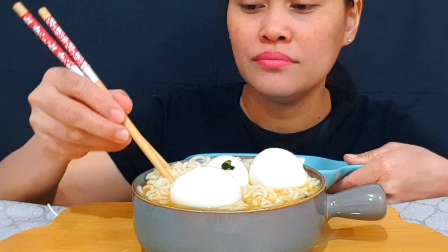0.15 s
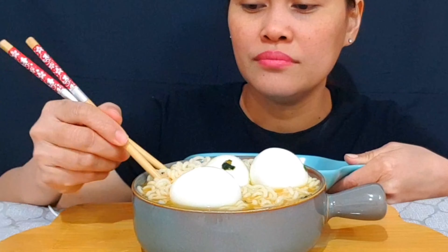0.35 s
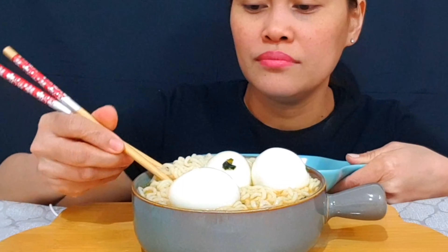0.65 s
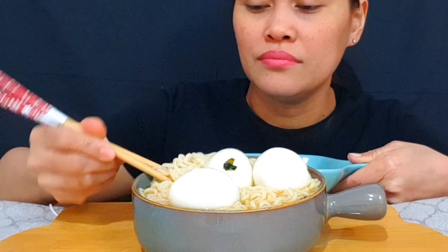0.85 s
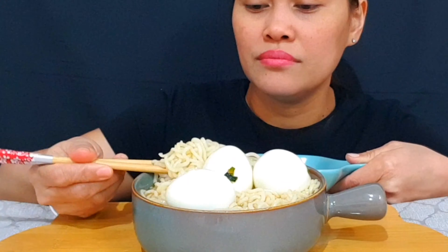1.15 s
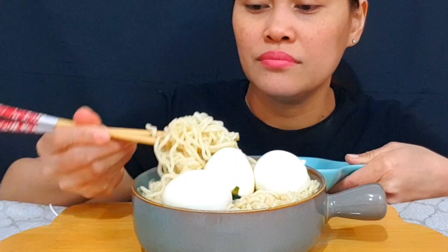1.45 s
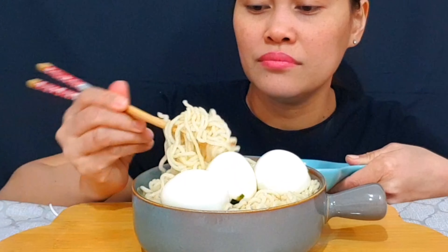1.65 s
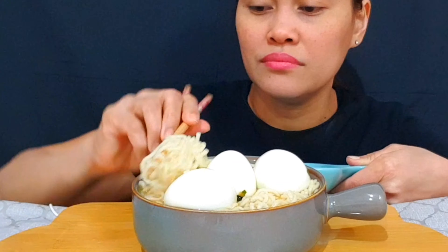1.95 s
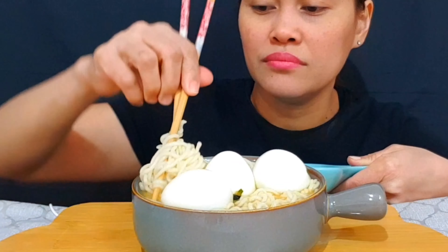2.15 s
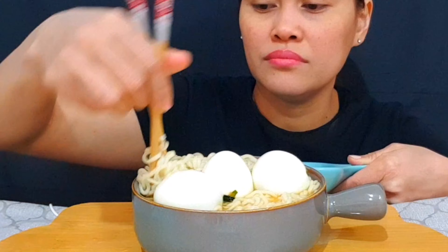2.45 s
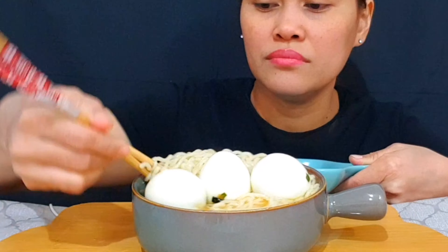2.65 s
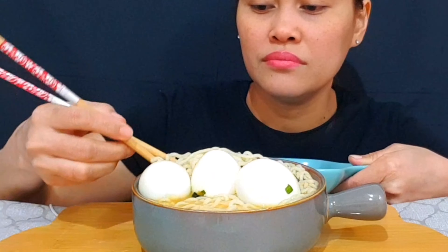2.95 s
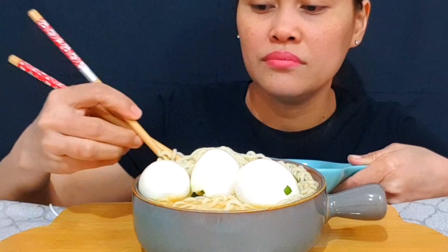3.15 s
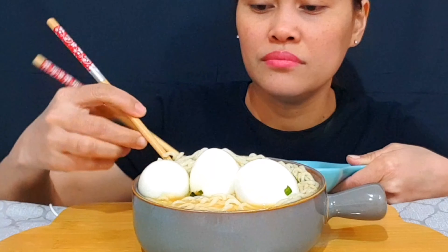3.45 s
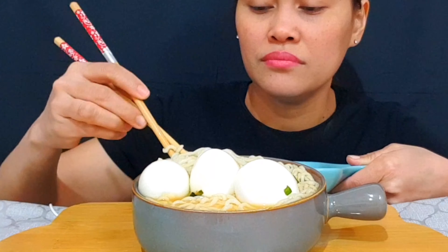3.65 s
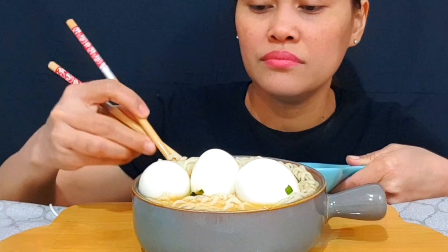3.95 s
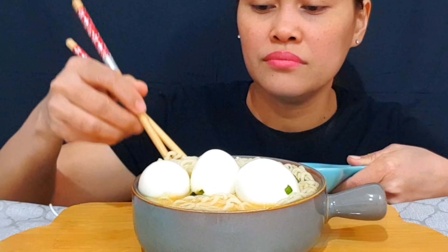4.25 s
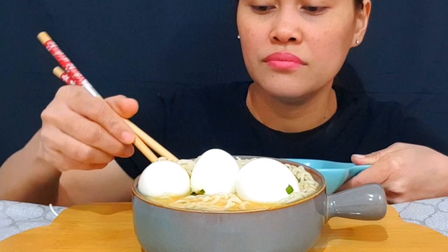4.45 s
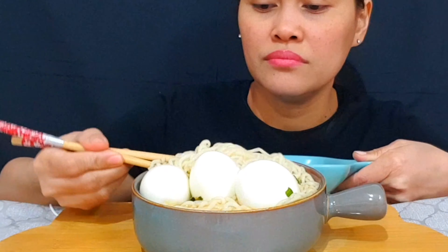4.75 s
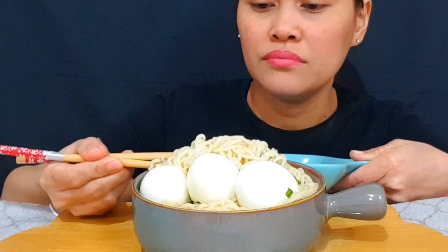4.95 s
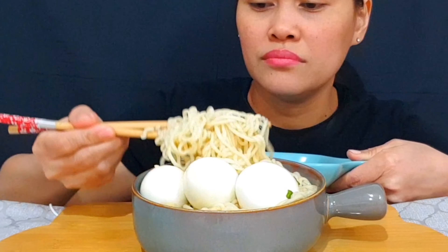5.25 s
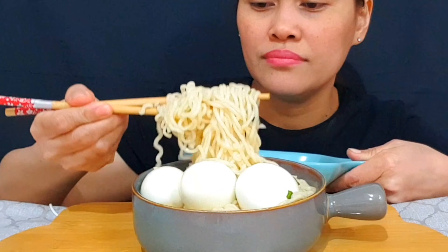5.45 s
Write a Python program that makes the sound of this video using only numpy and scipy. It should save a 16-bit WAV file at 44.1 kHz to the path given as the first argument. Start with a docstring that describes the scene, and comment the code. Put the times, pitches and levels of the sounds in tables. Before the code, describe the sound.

Scattered soft handling sounds open the scene: low rubs, muffled bumps, little snaps of wet noodles and wooden chopsticks ticking together. After a sparser stretch, the rubbing swells and the sticks strike the ceramic pot with a loud, short clink, then clink again and bounce lightly. Everything is heard up close in a quiet, dry room with faint hum and microphone hiss.

```python
"""A quiet, dry room, close to a ceramic pot of broth: wooden chopsticks stir and lift noodles.
Each hand movement brings a soft low rubbing rumble of handling and a faint hiss; between and among
them come small bumps and snaps of wet strands. The sticks tick against each other in their bending modes.
Twice they knock the pot, whose wall clinks while they bounce on it.
Low room noise, a hum and microphone hiss lie underneath."""
import sys
import numpy as np
from scipy import signal
from scipy.fft import rfft, irfft, next_fast_len
from scipy.io import wavfile
from scipy.ndimage import uniform_filter1d

SR = 44100
rng = np.random.default_rng(int(sys.argv[2]) if len(sys.argv) > 2 else 0)


def output_pcm(signal):
    """Save a mono or channel-first signal as 16-bit PCM at the path in sys.argv[1].

    Samples are clipped to [-1, 1] before scaling.
    """
    pcm = np.clip(np.atleast_2d(signal).T, -1, 1) * 32767
    wavfile.write(sys.argv[1], SR, np.round(pcm).astype(np.int16))


N = 246750


def from_db(db):
    """Decibels to gain."""
    return 10 ** (np.asarray(db) / 20)


def rms_one(x):
    """Scale to rms 1."""
    return x / np.sqrt(np.mean(x ** 2) + 1e-20)


def seconds(length_s):
    """Time axis."""
    return np.arange(int(length_s * SR)) / SR


def add(out, time_s, sound):
    """Mix a sound in at time_s."""
    start = int(round(time_s * SR))
    out[start:start + len(sound)] += sound[:N - start]


def cut(x, hz, kind, order=2):
    """Butterworth low- or high-pass."""
    return signal.sosfilt(signal.butter(order, min(hz, .45 * SR), kind, fs=SR, output="sos"), x + 1e-18)


def resonate(x, hz, width_hz):
    """Two-pole resonance, peak gain 1."""
    radius = np.exp(-np.pi * width_hz / SR)
    feedback = [1, -2 * radius * np.cos(2 * np.pi * hz / SR), radius ** 2]
    return signal.lfilter(np.array([1, 0, -1]) * (1 - radius ** 2) / 2, feedback, x + 1e-18)


def colour(x, spectrum):
    """Shape by (frequency [Hz], level [dB]) points; rms 1."""
    size = next_fast_len(N)
    hz, db = np.transpose(spectrum)
    bins_hz = np.maximum(np.arange(size // 2 + 1) * SR / size, 1)
    gain = from_db(np.interp(np.log(bins_hz), np.log(hz), db))
    return rms_one(irfft(rfft(x, size) * gain, size)[:N])


def grains(per_s, spread_db):
    """Clicks of random time, size and sign."""
    sizes = from_db(spread_db * np.minimum(rng.exponential(1, N), 4))
    return (rng.random(N) < per_s / SR) * sizes * rng.choice([-1, 1], N)


def ring(t, hz, t60_s):
    """One struck mode: a decaying sine."""
    return np.sin(2 * np.pi * hz * t) * np.exp(-np.log(1000) * t / t60_s)


def background(room_db=-56.5, hum_hz=120, hum_width_hz=14, hum_db=-65, hiss_db=-66.5, side_db=-67):
    """Low room noise, a wavering hum and microphone hiss, part of it wide; stereo."""
    # noise spectra: (frequency [Hz], relative density [dB])
    room_spectrum = [(12, -50), (20, -26.5), (27, -18.5), (43, -4.5), (113, -7), (131, -3.5), (147, -16.5),
                     (318, -25), (653, -37), (1000, -39), (1300, -68), (2200, -120)]
    hiss_spectrum = [(400, -10), (1000, -1.5), (2500, -2.5), (5000, -3.5), (8500, 1), (11500, -3.5),
                     (15500, -5)]
    side_spectrum = [(30, 5.5), (300, -3), (3000, -1.5), (8000, 0.5), (15000, -1.5)]
    white = rng.standard_normal((4, N))
    room = from_db(room_db) * colour(white[0], room_spectrum)
    hum_band = resonate(resonate(white[1], hum_hz, hum_width_hz), hum_hz, hum_width_hz)
    hum = from_db(hum_db) * rms_one(hum_band)
    hiss = from_db(hiss_db) * colour(white[2], hiss_spectrum)
    side = from_db(side_db) * colour(white[3], side_spectrum)
    return room + hum + hiss + side * np.array([[1], [-1]])


def movement(start_s, length_s, swell_db, attack_s=0.013, release_db_per_s=499.5):
    """Envelope of one hand movement: quick onset, a level ramp, fast release."""
    t = np.arange(N) / SR - start_s
    ramp_db = swell_db * (np.clip(t / length_s, 0, 1) - 1)
    release_db = release_db_per_s * np.maximum(t - length_s, 0)
    return np.clip(t / attack_s, 0, 1) * from_db(ramp_db - release_db)


def handling(low_hz=60, top_hz=450, even_s=0.017, power_floor=0.16, flutter=.6):
    """Soft low rubbing rumble of handling, with a faint fine hiss, swelling with each hand movement."""
    # hand movements: (start [s], length [s], end level [dB], swell to the end [dB], hiss re rumble [dB])
    moves = [(0.188, 0.032, -40.5, 0, -19.5), (0.494, 0.12, -44, 17, -20.5), (0.631, 0.18, -41, 7, -24.5),
             (1.255, 0.051, -55, -0.5, -35), (1.893, 0.17, -47, -1, -21), (2.525, 0.036, -53.5, 1, -22),
             (2.597, 0.042, -47, 11, -24), (2.643, 0.14, -44, -0.5, -22.5), (2.88, 0.045, -59, 0, -15),
             (3.226, 0.051, -52.5, 9, -17), (3.878, 0.1, -59, 2, -30), (4.162, 0.095, -61, -7, -28),
             (4.319, 0.061, -42.5, 15, -20), (4.403, 0.12, -32, 3.5, -18)]
    # rumble resonances: (frequency [Hz], width [Hz], level [dB])
    bands = [(90, 25, -7.5), (177.4, 64, 2), (256, 80, -1), (338, 79, -3)]
    # fine hiss: (frequency [Hz], relative density [dB])
    hiss_spectrum = [(700, -4.5), (950, 9), (1400, -6), (2500, -2), (4500, -2.5), (9000, -5.5),
                     (11000, -19), (16000, -31.5)]
    rubbing = grains(per_s=480, spread_db=3)
    rumble = sum(from_db(db) * resonate(rubbing, hz, width_hz) * (-1) ** k
                 for k, (hz, width_hz, db) in enumerate(bands))
    rumble = rms_one(cut(cut(rumble, top_hz, "low", order=4), low_hz, "high"))
    power = uniform_filter1d(rumble ** 2, int(even_s * SR))
    rumble = rms_one(rumble / np.sqrt(power + power_floor))   # evens out the level
    fine_grains = grains(per_s=23000, spread_db=1.5) * (1 + flutter * rumble)
    hiss = colour(cut(fine_grains, 600, "high"), hiss_spectrum)
    return sum(from_db(db) * movement(start_s, length_s, swell_db) * (rumble + from_db(hiss_db) * hiss)
               for start_s, length_s, db, swell_db, hiss_db in moves)


def bumps(low_hz=45, top_hz=600):
    """Handling bumps: dull pushes that die within a few cycles."""
    # soft bumps: (time [s], level [dB], frequency [Hz], t60 [s])
    pushes = [(0.1915, -19, 189, 0.012), (0.2168, -26.5, 260, 0.0076), (0.7836, -20.5, 207, 0.049),
              (0.808, -47, 170, 0.013), (0.595, -29, 193, 0.035), (1.971, -26.5, 88.6, 0.098),
              (2.017, -32.5, 83, 0.09), (2.249, -33.5, 105, 0.039), (2.667, -28, 103, 0.045),
              (2.785, -27.5, 173, 0.019), (3.709, -35.5, 114, 0.064), (4.171, -30, 138, 0.032),
              (4.407, -28.5, 149, 0.037)]
    out, t = np.zeros(N), seconds(.2)
    for time_s, db, hz, t60_s in pushes:
        add(out, time_s, from_db(db) * ring(t, hz, t60_s))
    return cut(cut(out, top_hz, "low"), low_hz, "high")


def pot_ring(t, place):
    """Modes of the pot; the place struck on its wall (0-1) sets their mix."""
    # wall modes: (frequency [Hz], level at place 0 [dB], level at place 1 [dB], t60 [s])
    modes = [(953, -17.5, -22, .225), (1045, -15.5, -26, .195), (1096, -33, -13, .19),
             (2526, -17, -15, .125), (1290, -28, -23, .04), (1560, -27, -25, .018), (1922, -40, -25, .055),
             (2745, -36, -30, .05), (2860, -36, -36, .13), (3620, -24, -14, .06), (4400, -11, -17, .018),
             (4865, -22, -22, .036), (5600, -24, -24, .018), (6748, -46, -30, .06), (7308, -29, -20, .075),
             (7855, -42, -37, .07), (10650, -33, -24, .07), (11335, -50, -33, .075), (8850, -44, -40, .06),
             (12440, -50, -39, .025)]
    return sum(from_db(db0 + place * (db1 - db0)) * ring(t, hz, t60_s) * (-1) ** k
               for k, (hz, db0, db1, t60_s) in enumerate(modes))


def snaps(relative_width=0.38, broad_db=-10, pot_db=-9, muffle_s=0.018):
    """Wet strands part in brief bright bursts; the pot, damped by the stick touching it, answers faintly with a
    short ring."""
    # breaking films: (time [s], level [dB], decay [s], centre [Hz])
    breaks = [(.1921, -54, 0.0035, 3980), (0.2183, -35, 0.00079, 7400), (0.222, -44, 0.0028, 5400),
              (0.7825, -32.5, 0.0022, 4200), (0.788, -43, 0.0044, 4400), (0.8072, -34, 0.0014, 4200),
              (2.0254, -49, 0.0032, 4250), (2.148, -51.5, 0.0034, 6960), (2.6462, -36.5, 0.002, 4140),
              (2.787, -45, 0.0026, 4530), (3.418, -49, 0.0046, 4970), (4.448, -23, 0.0024, 3500)]
    out, t = np.zeros(N), seconds(0.068)
    pot = from_db(pot_db) * cut(pot_ring(t, place=0.94), 2000, "high", order=4) * np.exp(-t / muffle_s)
    for time_s, db, decay_s, hz in breaks:
        burst = rng.standard_normal(len(t)) * np.exp(-t / decay_s)
        broad = from_db(broad_db) * cut(cut(burst, 1100, "high"), 8000, "low", order=1)
        add(out, time_s, from_db(db) * (resonate(burst, hz, relative_width * hz) + broad + pot))
    return out


def ticks(rattle_s=0.0099, rattle_low_hz=1000, rattle_top_ratio=1.43):
    """The sticks touch: a tiny rattle plus bending modes, some favoured by the point of contact."""
    # light touches: (time [s], ring [dB], favoured [Hz], fall either side [dB/octave], rattle [dB])
    touches = [(0.1075, -51, 1630, 20, -51), (0.3074, -45, 1290, 9, -50), (.535, -56, 1140, 11, -52.5),
               (0.746, -53, 1900, 29, -54.5), (.962, -63, 1300, 10, -64), (1.562, -72, 3400, 13, -62),
               (2.7866, -41.5, 1020, 24, -52), (3.4173, -36.5, 2030, 19.5, -52.5),
               (3.5435, -59.5, 2420, 0.5, -54.5), (4.318, -57, 2140, 12, -45.5),
               (4.4093, -34.5, 1220, 5.5, -55), (4.5449, -22, 1190, 16, -43)]
    # chopstick modes: (frequency [Hz], level [dB], t60 [s])
    modes = [(1038, -13, 0.091), (1225, -9.5, 0.11), (1885, -10.5, 0.053), (2484, -14.5, 0.034),
             (3370, -2, 0.056), (4872, -8.5, 0.12), (7010, 3, .055)]
    out, t = np.zeros(N), seconds(.2)
    for time_s, ring_db, favoured_hz, db_per_octave, rattle_db in touches:
        wood = sum(from_db(db - db_per_octave * abs(np.log2(hz / favoured_hz))) * ring(t, hz, t60_s)
                   for hz, db, t60_s in modes)
        rattle = rng.standard_normal(len(t)) * np.exp(-t / rattle_s)
        rattle = 2 * cut(cut(rattle, rattle_low_hz, "high"), rattle_top_ratio * favoured_hz, "low", 4)
        add(out, time_s, from_db(ring_db) * wood + from_db(rattle_db) * rattle)
    return out


def knocks(contact_at_0db_s=.00048, shortening=0.12, recoil_s=0.0033, thud_db=-34, damping=0.17,
           crack_db=-20, crack_s=0.0052, noise_top_hz=6500, tail_db=-45, room_t60_s=.34):
    """A stick hits the pot: a push of air, a slower recoil, a thud, a crack and the ringing wall."""
    # hits and bounces: (time [s], push [dB], ring [dB], low cut [Hz], high cut [Hz], wall place [0-1])
    hits = [(4.5488, 3, 0.5, 304, 9960, 0), (4.5877, -9, -8.5, 1974, 3200, 0.7),
            (5.1342, -4.5, -2.5, 300, 14100, 1), (5.1844, -5.5, -18, 400, 6250, 1),
            (5.2234, -22.5, -26.5, 1495, 2850, 0.4), (5.2627, -21.5, -21, 960, 2480, 0.56),
            (5.495, -69.5, -51, 910, 4930, 0.87), (5.584, -61, -44.5, 1490, 12100, 0.63)]
    out, t = np.zeros(N), seconds(.5)
    recoil = np.sin(np.pi * np.minimum(t / recoil_s, 1)) ** 2
    thud = from_db(thud_db) * ring(t, hz=185, t60_s=0.028)   # the pot rocks on its wooden board
    for time_s, push_db, ring_db, low_hz, high_hz, place in hits:
        contact_s = contact_at_0db_s * from_db(-shortening * push_db)   # harder is shorter
        push = np.sqrt(np.abs(np.sin(np.pi * np.minimum(t / contact_s, 1))))
        push = cut(push - recoil * push.sum() / recoil.sum(), 4200, "low", order=4)
        thump = cut(push + thud, 45, "high")
        crack = from_db(crack_db) * rng.standard_normal(len(t)) * np.exp(-t / crack_s)
        crack = cut(cut(crack, noise_top_hz, "low"), 11000, "low", order=4)
        clink = pot_ring(t, place) + crack
        clink = cut(cut(clink, low_hz, "high"), high_hz, "low")   # glancing hits excite a narrower band
        room_tail = from_db(tail_db - 60 * t / room_t60_s) * rng.standard_normal(len(t))
        room_tail = cut(room_tail, noise_top_hz, "low")
        landing = np.clip((np.arange(N) / SR - time_s) / recoil_s, 0, 1)
        out *= 1 - damping * landing   # the stick damps what still rings
        add(out, time_s, from_db(push_db) * thump + from_db(ring_db) * (clink + room_tail))
    return out


def scene():
    """Pot and handling sounds in the centre, over the stereo background."""
    return knocks() + ticks() + snaps() + bumps() + handling() + background()


def record(dry, threshold_db=-20, duck_slope=0.17, release_db_per_s=7, attack_s=0.0018, top_hz=15800):
    """Soft clip, gain control that ducks after loud peaks and recovers slowly, steep low-pass."""
    clipped = np.tanh(dry)
    peak_db = 20 * np.log10(np.abs(clipped).max(axis=0) + 1e-9)
    fall_db = release_db_per_s * np.arange(N) / SR
    held_db = np.maximum.accumulate(peak_db + fall_db) - fall_db
    pole = np.exp(-1 / (attack_s * SR))
    duck_db = signal.lfilter([1 - pole], [1, -pole], duck_slope * np.maximum(held_db - threshold_db, 0))
    low_pass = signal.ellip(10, .1, 80, top_hz, fs=SR, output="sos")
    return signal.sosfilt(low_pass, clipped * from_db(-duck_db))


dry = scene()
out = record(dry)
output_pcm(out)
```